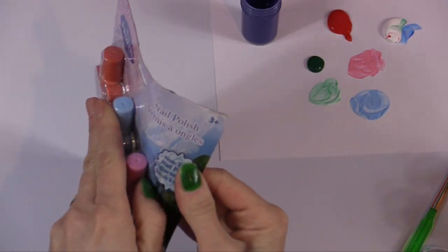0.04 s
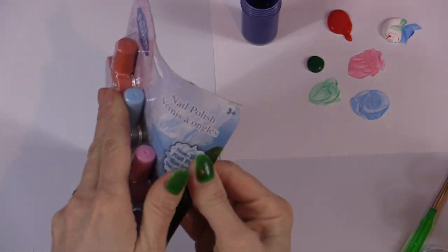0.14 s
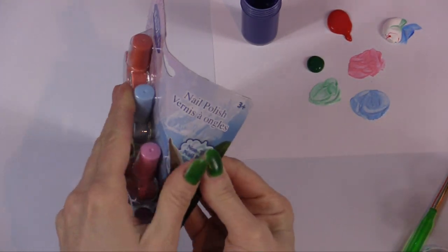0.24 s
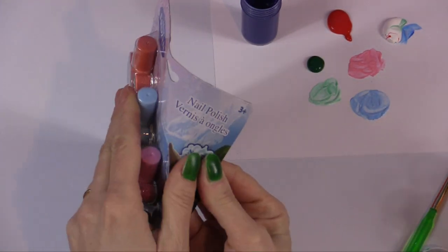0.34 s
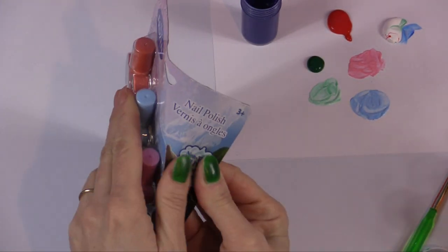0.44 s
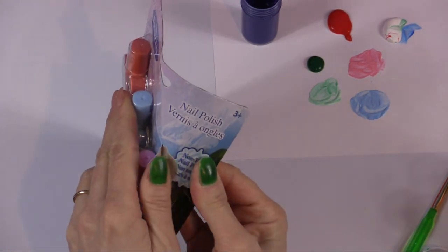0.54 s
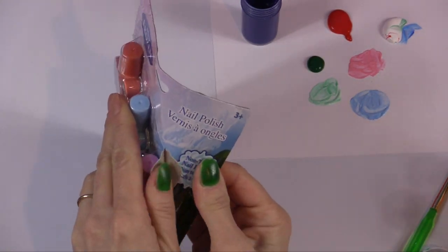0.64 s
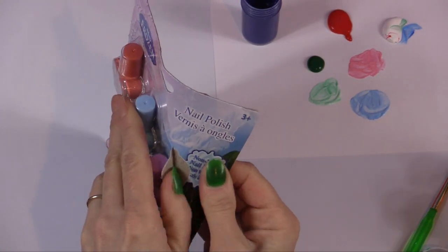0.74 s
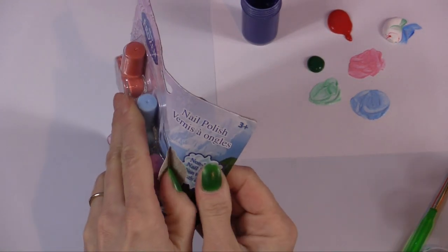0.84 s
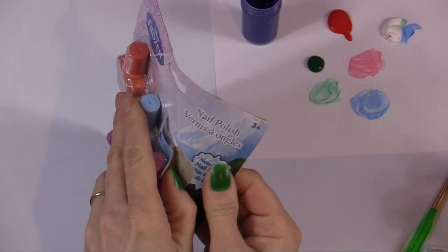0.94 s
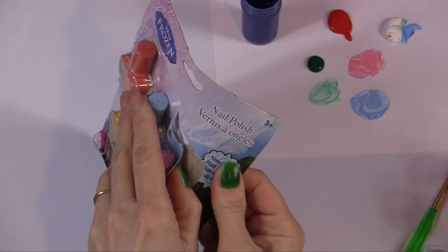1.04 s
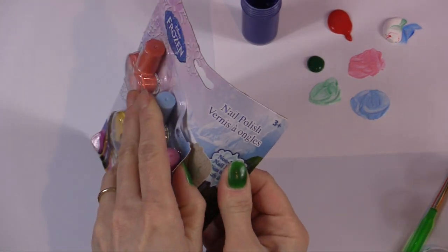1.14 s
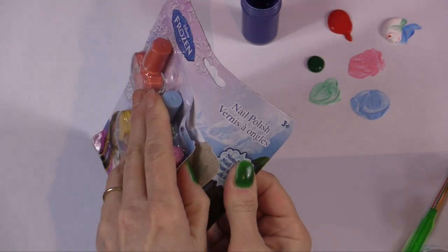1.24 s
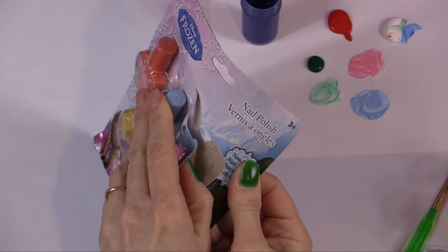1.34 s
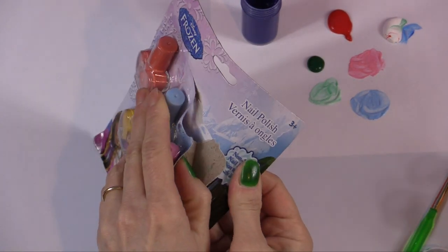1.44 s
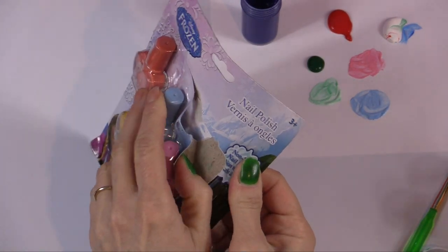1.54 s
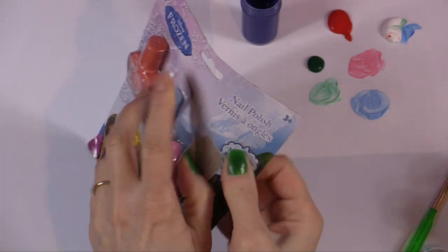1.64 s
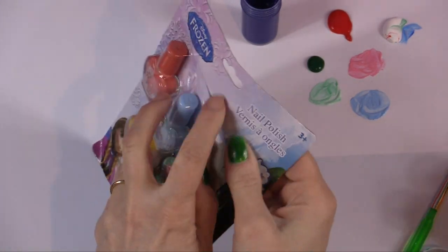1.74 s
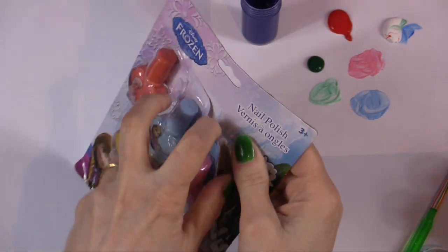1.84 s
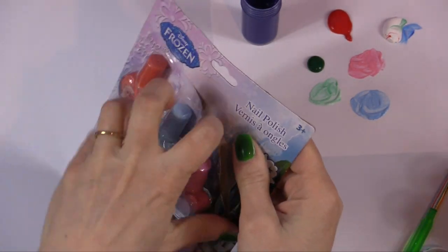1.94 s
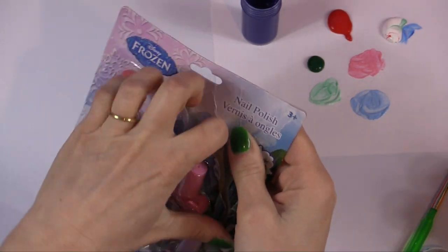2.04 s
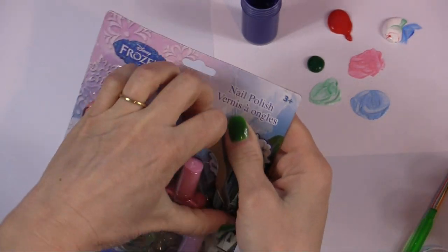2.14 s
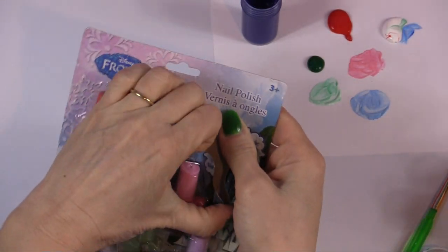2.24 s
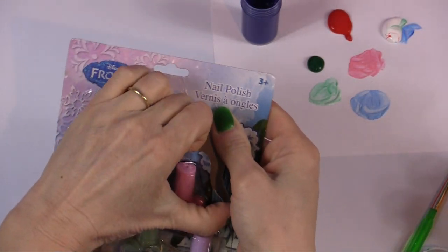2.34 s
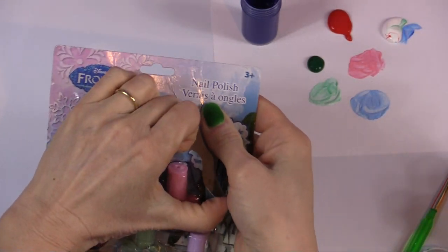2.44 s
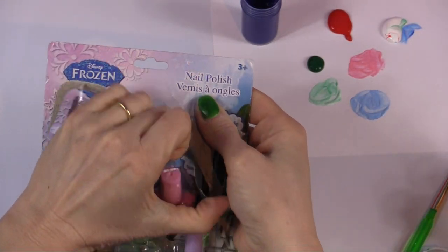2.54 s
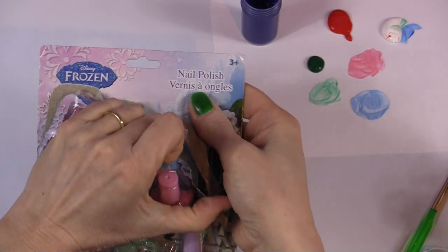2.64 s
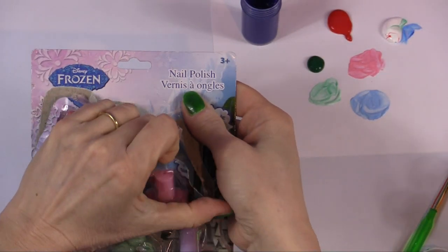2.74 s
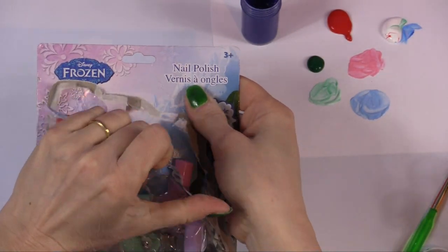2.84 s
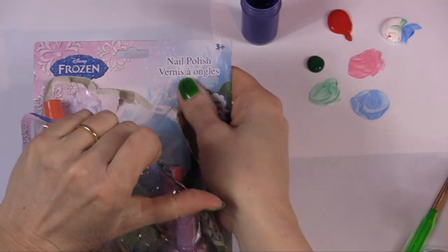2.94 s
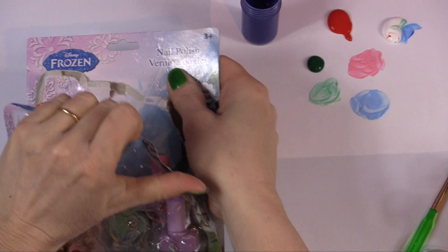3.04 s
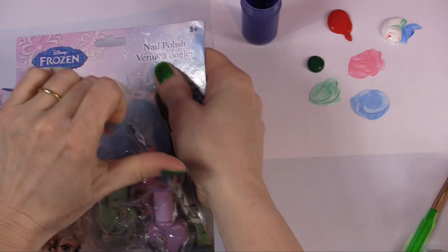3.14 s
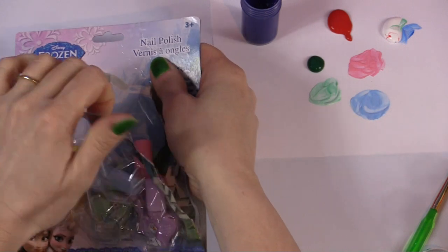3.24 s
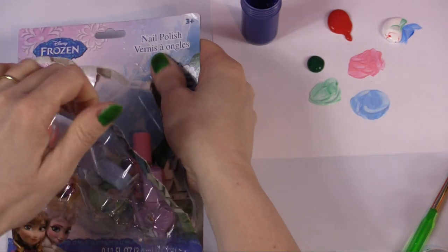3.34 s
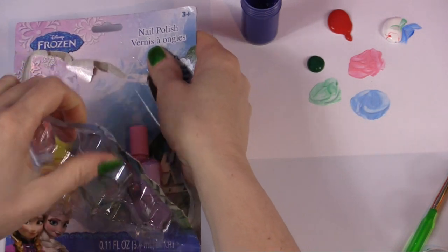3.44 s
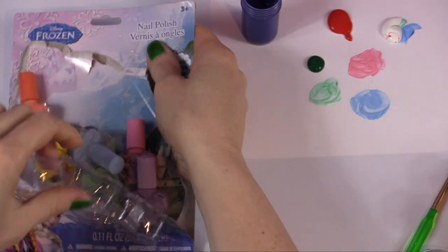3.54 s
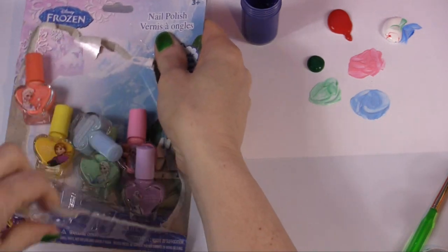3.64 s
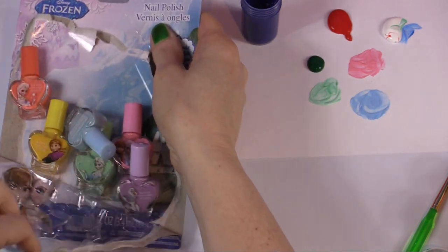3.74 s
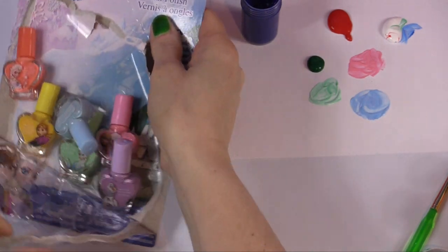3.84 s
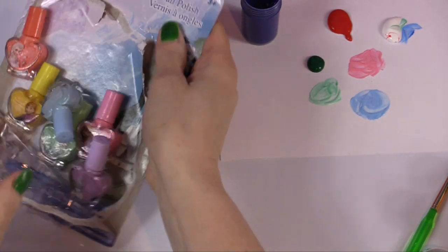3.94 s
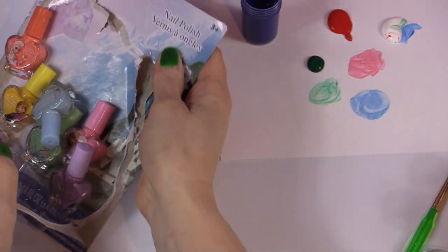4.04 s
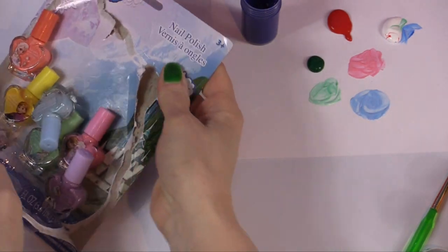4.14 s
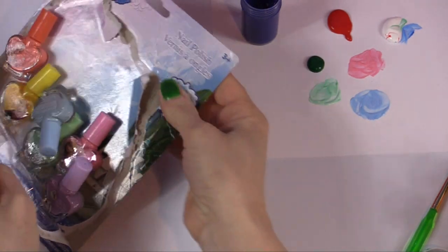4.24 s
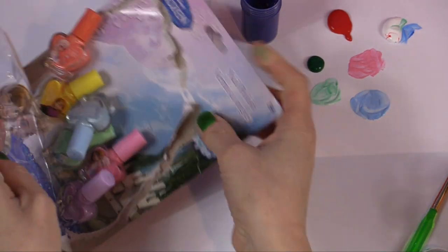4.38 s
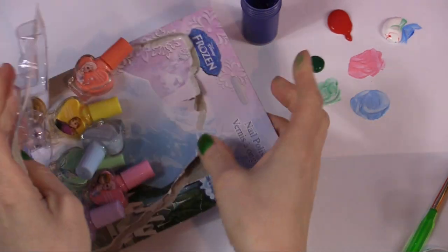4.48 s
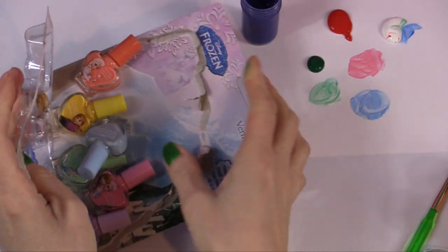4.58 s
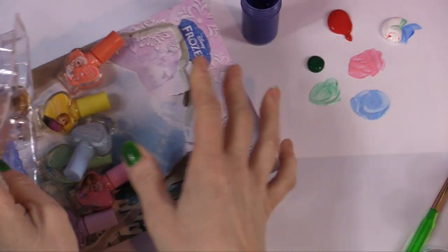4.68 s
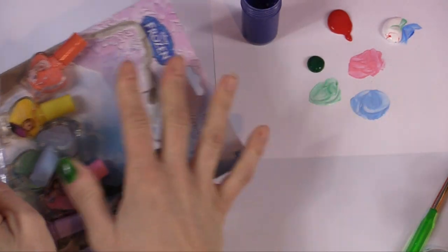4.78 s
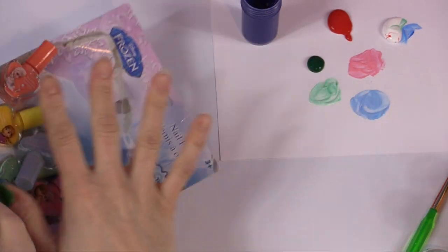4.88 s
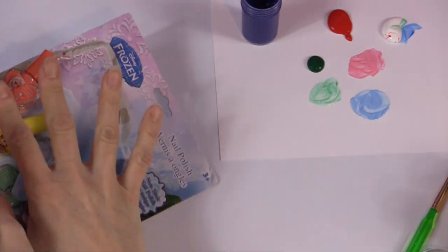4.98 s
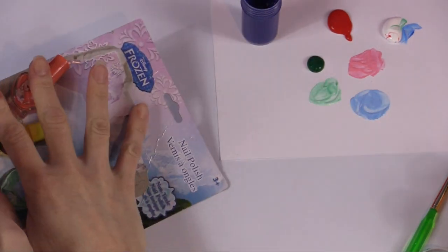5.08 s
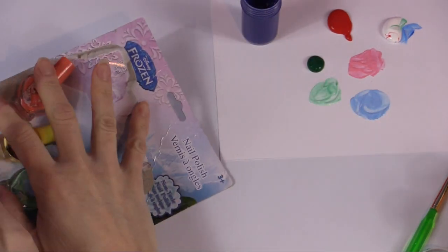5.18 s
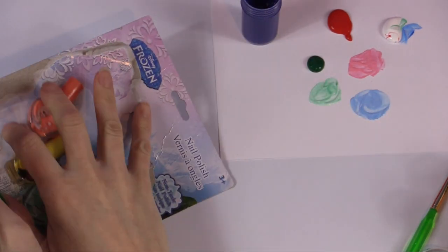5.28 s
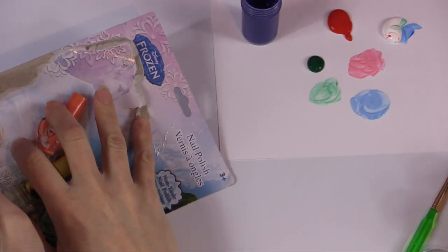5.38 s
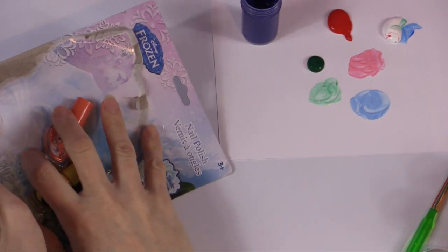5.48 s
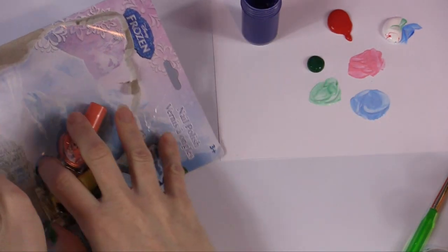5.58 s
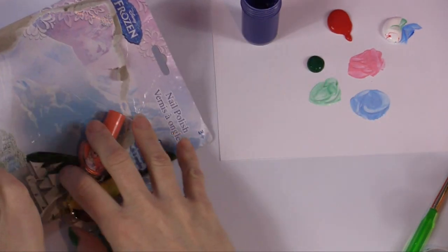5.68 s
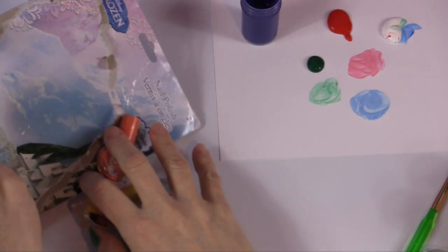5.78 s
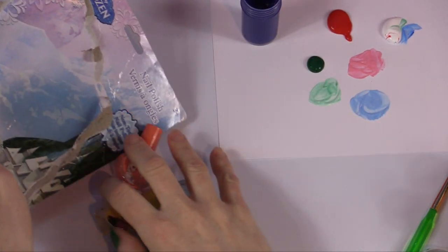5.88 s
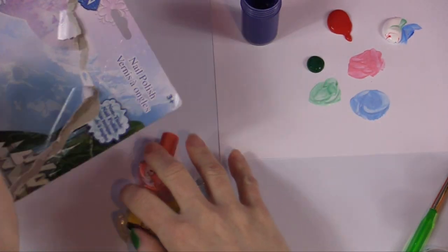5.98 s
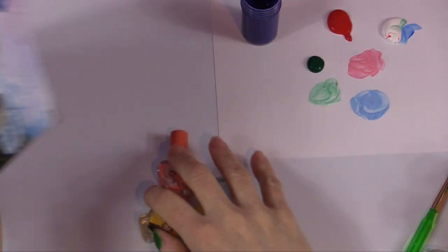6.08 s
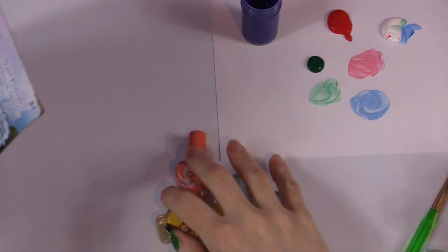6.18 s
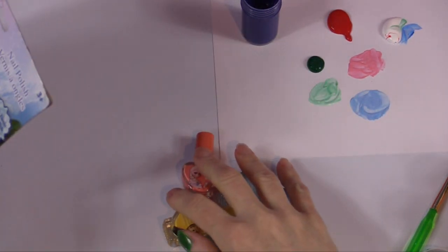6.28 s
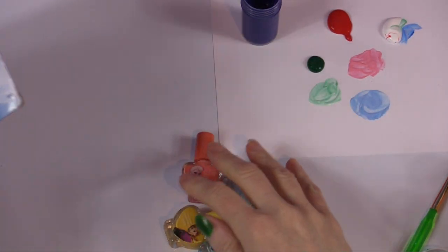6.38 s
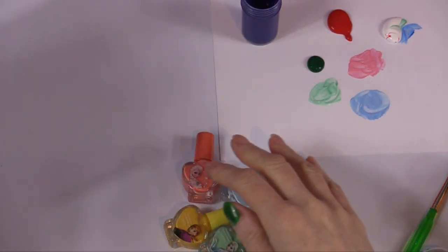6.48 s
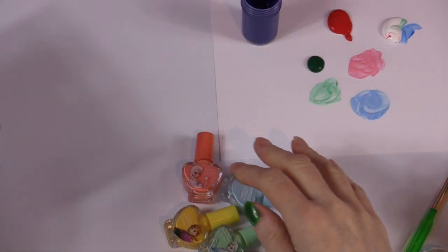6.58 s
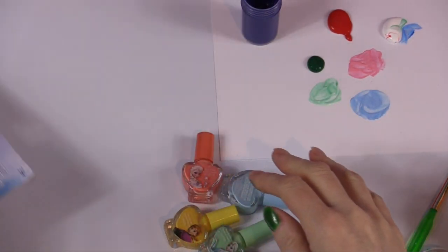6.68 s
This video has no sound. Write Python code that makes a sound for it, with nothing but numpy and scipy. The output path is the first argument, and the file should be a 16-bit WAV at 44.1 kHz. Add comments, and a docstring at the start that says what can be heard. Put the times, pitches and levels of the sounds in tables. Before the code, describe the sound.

Close in a small, softly echoing room with quiet hiss, hands peel a plastic blister from a card. A few crisp snaps come at 0.2-0.4 s, then sparse crackle; around 0.9-1.6 s the glued seam opens in a faint gritty rasp with isolated clicks and a soft low rub. From 1.8 s the snaps crowd together, with a very sharp pop near 2.27 s. The loudest stretch is 2.5-3.4 s: hard cracks, hollow buckling plastic, short paper rips and dull bumps. It thins to lighter crinkles until 4.3 s, with small scrapes and a bump near 4.6 s. At 5.0-5.35 s more snaps join a light sliding scrape and a barely audible high thin squeak. From about 5.4 to 6.15 s small bottles tumble onto the paper-covered table in quick dull knocks, strongest at the end. Then near silence, with a faint tick around 6.35 s.

```python
"""In a small room, close to the microphone, hands peel a plastic blister off its cardboard card.
Each pull builds up until the glued paper gives way in crackle and short rips (random tiny fractures
ringing stiff patches), and the thin plastic buckles in sharp snaps (shaped noise bursts and short rings).
Then the card is pushed aside (stick-slip grains), and small bottles tumble off it and knock on
a paper-covered table (noise blows through resonant bodies). Room echo and a quiet hiss surround it all."""
import sys
import numpy as np
from scipy import signal
from scipy.fft import rfft, irfft, next_fast_len
from scipy.io import wavfile
from scipy.ndimage import uniform_filter1d

SR = 44100
rng = np.random.default_rng(int(sys.argv[2]) if len(sys.argv) > 2 else 0)


def store_pcm(level_fs):
    """Save levels as 16-bit WAV."""
    pcm = np.round(np.clip(level_fs, -1, 1) * 32767).astype(np.int16)
    wavfile.write(sys.argv[1], SR, np.atleast_2d(pcm).T)


N = 296081  # length in samples

# Buckles of the blister, and in the last row a snap-like flick of the card. Each row: start in seconds, crack
# level in dB, crack pitch in Hz, # level of the whole sheet flexing in dB, sheet pitch in Hz.
BUCKLES = [(0.1875, -16.5, 4840, -36.5, 1690), (0.2735, -16, 4030, -22, 940),
           (0.298, -10.5, 3600, -30.5, 1340), (0.399, -32.5, 7430, -54, 750),
           (0.586, -27.5, 3400, -46, 1040), (0.9245, -25, 4700, -60, 1310),
           (0.9659, -23, 11350, -31.5, 1010), (1.004, -13.5, 3830, -34.5, 1700),
           (1.255, -30.5, 4490, -58, 980), (1.2859, -14.5, 3730, -44, 1170),
           (1.482, -13.5, 5250, -33.5, 1720), (1.5585, -34, 5630, -34, 870), (1.6175, -20, 6000, -43, 1690),
           (1.7094, -26, 3540, -38.5, 920), (1.811, -22.5, 4220, -37, 830),
           (1.854, -16.5, 3430, -31.5, 501), (1.882, -13.5, 4630, -32, 1650),
           (1.9004, -9.5, 8300, -28.5, 501), (1.939, -20, 3610, -41, 500), (1.9702, -26.5, 3670, -30, 786),
           (1.995, -20.5, 3960, -43, 934), (2.046, -25, 4030, -39.5, 900), (2.162, -42.5, 3570, -32, 825),
           (2.2476, -12.5, 3820, -30, 780), (2.2657, -17, 4130, -27, 1240), (2.271, -3, 4160, -24, 715),
           (2.3253, -18.5, 4350, -30.5, 840), (2.357, -18.5, 3380, -14, 968),
           (2.383, -18.5, 3560, -32.5, 1210), (2.4487, -19, 2670, -32.5, 820),
           (2.5238, -14.5, 4510, -32.5, 610), (2.5391, -7.5, 4460, -28.5, 1130),
           (2.583, -8.5, 3430, -24.5, 850), (2.6114, -9, 3700, -17.5, 762), (2.6257, -2, 7920, -17, 1270),
           (2.647, -9, 3960, -19.5, 1050), (2.7958, -11, 9000, -20, 805), (2.8584, -12.5, 5080, -27, 684),
           (2.8759, -13, 3410, -20, 875), (2.8854, -13, 3350, -14, 810), (2.9178, -2, 2800, -18.5, 845),
           (2.9773, -5, 4500, -13, 900), (2.9914, -19, 2850, -25.5, 1630), (3.022, -3.5, 3310, -19.5, 597),
           (3.1014, -17, 7240, -33.5, 1410), (3.1294, -22, 3210, -24.5, 1690),
           (3.1782, -12, 3230, -18.5, 554), (3.212, -13, 7950, -22, 1140),
           (3.2505, -10.5, 3310, -20.5, 680), (3.3451, -15.5, 3520, -20.5, 1220),
           (3.374, -20, 11000, -39, 1300), (3.3959, -12.5, 3310, -20, 1350), (3.4863, -23, 3250, -36, 820),
           (3.5227, -29.5, 4820, -28.5, 646), (3.5805, -18.5, 3700, -24.5, 680),
           (3.6399, -24, 2860, -31, 620), (3.674, -23.5, 4100, -34, 1360),
           (3.7912, -23.5, 3640, -30.5, 670), (3.8291, -24.5, 4300, -34, 1070),
           (3.913, -22.5, 2970, -41, 820), (3.9784, -13.5, 3790, -32.5, 900),
           (4.0262, -23, 3900, -34.5, 600), (4.1194, -26.5, 3130, -37.5, 860),
           (4.2124, -27.5, 4220, -39, 1230), (4.236, -22, 5800, -48, 1220), (4.2667, -20, 3470, -57, 1190),
           (4.3101, -21.5, 5030, -38, 960), (4.528, -30, 2800, -33.5, 1610),
           (5.008, -17.5, 5000, -32, 1170), (5.022, -19, 5200, -53, 910), (5.1332, -18, 4750, -31, 565),
           (5.242, -19.5, 5000, -46, 1130), (5.299, -16, 4280, -33.5, 980),
           (5.328, -19.5, 5000, -35.5, 960), (6.341, -32, 5670, -52.5, 900)]
# Hands, bottles and card bump the table. Each row: start in seconds, thud level in dB, thud pitch in Hz.
TABLE_KNOCKS = [(1.899, -37.5, 149), (2.996, -27.5, 212), (3.023, -24.5, 253), (3.5875, -27, 494),
                (4.623, -33.5, 690), (4.716, -43, 1300), (5.046, -36, 584), (5.182, -38, 815),
                (5.373, -34, 614), (5.447, -37.5, 615), (5.561, -33, 513), (5.574, -27.5, 490),
                (5.645, -36, 490), (5.706, -25, 324), (5.734, -25.5, 436), (5.785, -27.5, 536),
                (5.826, -32, 545), (5.876, -31.5, 377), (5.94, -29, 540), (6.047, -24, 590),
                (6.071, -25.5, 533), (6.102, -23, 750), (6.139, -31.5, 660), (6.386, -45.5, 400)]
# Fast runs of tearing and scraping. Each row: start in seconds, length in seconds,
# crackle level in dB, card level in dB.
FIBRE_RIPS = [(0.522, 0.065, -54.5, -67), (2.594, 0.031, -19.5, -26), (2.81, 0.075, -32, -33.5),
              (2.969, 0.021, -24, -22.5), (3.021, 0.049, -41, -29.5), (3.169, 0.017, -25.5, -21),
              (3.24, 0.012, -27, -24), (3.314, 0.023, -36, -24), (3.389, 0.0039, -18.5, -27),
              (3.586, 0.016, -41.5, -53), (4.449, 0.062, -60, -43.5), (4.618, 0.029, -43, -36),
              (4.86, 0.039, -44.5, -42), (4.998, 0.038, -40.5, -43)]
# Pulls that strain the paper. Each row: moment of giving way in seconds, build-up in seconds,
# crackle level in dB.
PAPER_PULLS = [(1.0, 0.083, -49.5), (1.48, 0.12, -47.5), (1.9, 0.2, -41), (2.261, 0.089, -33),
               (2.601, 0.13, -34.5), (2.95, 0.17, -49.5), (3.381, 0.13, -56.5), (3.74, 0.28, -51),
               (4.217, 0.066, -46.5), (4.59, 0.035, -48), (5.301, 0.033, -49)]
# Pushes that slide the card along. Each row: start in seconds, length in seconds, level in dB.
CARD_PUSHES = [(2.818, 0.15, -39), (4.212, 0.19, -54), (4.446, 0.16, -51), (4.865, 0.22, -47.5),
               (5.2, 0.52, -47)]
# The glued seam opens with a gritty rasp that swells twice. Each row: time in seconds, level in dB.
SEAM_LEVEL = [(.8, -64), (.89, -47), (.98, -42), (1.12, -57), (1.22, -48), (1.47, -41.5), (1.66, -75)]
# Spectrum of the thin plastic. Each row: frequency in Hz, relative level in dB per Hz.
PLASTIC_SPECTRUM = [(900, -4), (2100, -5), (3500, 1), (5500, -2.5), (8000, -2), (10000, -7), (12000, -5),
                    (16000, -14.5)]
# Spectrum of the card. Each row: frequency in Hz, relative level in dB per Hz.
CARD_SPECTRUM = [(20, -11), (100, -10), (300, -0.5), (560, 0.5), (850, 0), (1200, 1.5), (1600, -0.5),
                 (2100, -10), (4500, -42)]
# Spectrum of breaking paper fibres. Each row: frequency in Hz, relative level in dB per Hz.
FIBRE_SPECTRUM = [(900, -26), (2300, -0.5), (3600, 1), (5500, -2.5), (12000, -5.5), (16000, -9.5)]
# Spectrum of bottle, card and table top. Each row: frequency in Hz (for a hard blow), relative level in dB per Hz.
TABLE_SPECTRUM = [(25, -11), (90, -11.5), (220, -2.5), (600, -6), (1300, -8.5), (2200, -25), (5000, -47.5)]
# Spectrum of the opening seam. Each row: frequency in Hz, relative level in dB per Hz.
SEAM_SPECTRUM = [(2500, -25), (4000, -10), (8500, -11.5), (11500, -8.5), (16000, -18.5)]
# Spectrum of the pushed air. Each row: frequency in Hz, relative level in dB per Hz.
AIR_SPECTRUM = [(25, -1), (70, -2), (180, -9.5), (500, -34.5)]
# Spectrum of the steady hiss. Each row: frequency in Hz, relative level in dB per Hz.
HISS_SPECTRUM = [(20, -35), (80, -2.5), (350, -4.5), (2500, -17), (12000, -25.5), (16000, -32)]
# Reverberation of the room. Each row: frequency in Hz, time to fall by 60 dB in seconds.
REVERBERATION = [(1200, 0.23), (5000, 0.17)]

TOP_HZ = 16000  # upper band limit
SHORT = 4096  # samples in one brief sound or body response
SNAP_ROOM_DB = -2.5  # the sheet faces the microphone and sends less to the walls
# lesser buckles: crack and flex in dB over the crackle, and their central pitches
STRAY_DB, STRAY_FLEX_DB, STRAY_HZ, SHEET_HZ = 24.5, 5.5, 4270, 942
BUILD_DB, RELAX_DB_PER_S = 18, 171  # growth over the build-up, fall once the paper has given way
SHAKE_DB = -6  # the card trembles with the crackle
RUB_S, RUB_DB, RUB_DECAY_S, RUB_HZ = 1.032, -46.5, 0.076, 124  # start, level, fade and favoured pitch
TICK_DB = -4  # the tick of a hard knock, relative to its thud
PUSH_ATTACK_S, PUSH_RELEASE_S = 0.0081, 0.022
SCRATCH_DB = -8  # the scratch of fibres relative to the slide
SQUEAK_S, SQUEAK_LENGTH_S, SQUEAK_HZ, SQUEAK_DB = 5.19, 0.24, 12750, -63  # pitch in mid-stroke


def amp(db):
    """Decibels are twenty times the logarithm of amplitude."""
    return 10 ** (np.asarray(db) / 20)


def unit(x):
    """Scaling by the root mean square gives a signal unit power."""
    return x / np.sqrt(np.mean(x ** 2) + 1e-20)


def along(points, hz):
    """Linear interpolation of (Hz, value) points on a logarithmic frequency axis."""
    f, v = np.transpose(points)
    return np.interp(np.log(hz + 1), np.log(f + 1), v)


def curve(rows):
    """Linear interpolation in time: one value per sample from (s, value) rows."""
    return np.interp(np.arange(N) / SR, *np.transpose(rows))


def add(track, s, sound):
    """Superposition: a sound is summed into the track from time s on."""
    start = max(round(s * SR), 0)
    track[start:start + len(sound)] += sound[:max(N - start, 0)]


def body(x, spectrum, pitch_hz=1000, focus_db=0):
    """Minimum-phase resonance: x rings through a causal body that favours the octave around the pitch."""
    hz = np.fft.rfftfreq(SHORT, 1 / SR)
    octaves = np.log2((hz + 1) / pitch_hz)
    level_db = along(spectrum, hz) + focus_db / (1 + (2 * octaves) ** 2)
    cepstrum = irfft(np.log(amp(level_db)))
    # folding the cepstrum onto positive time makes the response causal
    cepstrum[1:SHORT // 2] *= 2
    cepstrum[SHORT // 2 + 1:] = 0
    response = irfft(np.exp(rfft(cepstrum)))
    return signal.fftconvolve(x, response)[:len(x)]


def burst(length, edge):
    """Impulsive excitation: a brief irregular force that stops more abruptly for a higher edge."""
    t = np.arange(SHORT) / SR
    return rng.standard_normal(SHORT) * np.exp(-(t / length) ** edge)


def sized(x, db, span):
    """Energy equivalence: a blow gets the energy of a sound of this level lasting span seconds."""
    return amp(db) * x * np.sqrt(span * SR / (np.sum(x ** 2) + 1e-20))


def grains(size, rate, spread_db):
    """Random fracture: tiny breaks at random moments (rate per second), many weak and a few strong."""
    chance, strength, sign = rng.random((size, 3)).T
    sizes = amp(spread_db * np.minimum(-np.log(1 - strength), np.pi))
    return (chance < rate / SR) * sizes * np.sign(sign - .5)


def wobble(size):
    """Smoothed noise: a random curve of rms 1 that turns about every size samples."""
    smooth = uniform_filter1d(rng.standard_normal(N), size)
    return unit(uniform_filter1d(smooth, size))


def crinkle(stroke, rate, spread_db, spectrum, low_hz, high_hz, count=6):
    """Local resonance: each tiny fracture rings one of several stiff patches, so the colour keeps changing."""
    size = len(stroke)
    steps = (np.arange(count) + rng.random(count)) / count
    pitches = low_hz * (high_hz / low_hz) ** steps
    patches = [body(stroke * grains(size, rate / count, spread_db), spectrum, hz, focus_db=14)
               for hz in pitches]
    return unit(sum(patches))


def hiss():
    """Stationary noise: white noise coloured by a fixed spectrum lies quietly under everything."""
    return amp(-63.5) * unit(body(rng.standard_normal(N), HISS_SPECTRUM))


def snaps(buckles):
    """Buckling instability: each patch cracks in a burst of about two milliseconds as the sheet swings.

    Returns what travels straight to the microphone and what spreads into the room."""
    direct, spread, t = np.zeros(N), np.zeros(N), np.arange(SHORT) / SR
    for s, crack_db, pitch_hz, flex_db, sheet_hz in buckles:
        swing = np.sin(2 * np.pi * sheet_hz * t) * np.exp(-t / 0.0012)
        flex = body(swing + burst(length=0.0056, edge=1.0), CARD_SPECTRUM, sheet_hz, focus_db=5.5)
        flex = sized(flex, flex_db, span=0.0029)
        # one direction hears a jagged burst; over all directions its colour evens out
        jagged = burst(length=0.0019, edge=1.25) * np.minimum(t / 0.00087, 1)
        crack = body(jagged, PLASTIC_SPECTRUM, pitch_hz, focus_db=7.5)
        ring = np.sin(2 * np.pi * pitch_hz * t) * np.exp(-t / 0.0012)  # the patch rings for a few cycles
        crack = unit(crack) + 0.55 * unit(ring)
        impulse = 1. * (t == 0)
        scattered = body(impulse, PLASTIC_SPECTRUM, pitch_hz, focus_db=4.5)
        add(direct, s, sized(crack, crack_db, span=0.00031) + flex)
        add(spread, s, amp(SNAP_ROOM_DB) * (sized(scattered, crack_db, span=0.00048) + flex))
    return direct, spread


def strays(strain, count=45):
    """Strain release: lesser buckles at random, as strong as the strain of the moment; rows as in BUCKLES."""
    rows = []
    for moment, force, patch, grip in rng.random((count, 4)):
        db = 20 * np.log10(strain[int(moment * N)] + 1e-9) + 6 * (force - .5)
        crack_hz = STRAY_HZ * 2 ** (patch - .5)
        sheet_hz = SHEET_HZ * 2 ** (grip - .5)
        rows.append((moment * N / SR, db + STRAY_DB, crack_hz, db + STRAY_FLEX_DB, sheet_hz))
    return rows


def rips():
    """Cascading fracture: a run of fibres breaks at once, swells, crackles and shakes the card."""
    out, t = np.zeros(N), np.arange(SHORT) / SR
    for s, length, crackle_db, card_db in FIBRE_RIPS:
        stroke = np.abs(np.sin(np.pi * np.clip(t / length, 0, 1))) ** 0.59
        crackle = crinkle(stroke, 2400, 7.4, FIBRE_SPECTRUM, low_hz=1980, high_hz=13500)
        shake = crinkle(stroke, 2500, 4.3, CARD_SPECTRUM, low_hz=400, high_hz=1490)
        add(out, s, sized(crackle, crackle_db, length) + sized(shake, card_db, length))
    return out


def pull_strength():
    """Loading and failure: the crackle of every pull grows steadily in dB, then relaxes quickly."""
    t = np.arange(N) / SR
    total = np.zeros(N)
    for s, build, db in PAPER_PULLS:
        growth = BUILD_DB * (t - s) / build
        relaxation = RELAX_DB_PER_S * (s - t)
        total += amp(db + np.minimum(growth, relaxation))
    return total


def peeling(strain):
    """Progressive fracture: fibres part one by one; along the glued seam they crowd into a gritty rasp."""
    clusters = uniform_filter1d(grains(N, rate=260, spread_db=6.0), size=60)
    clumps = 0.54 + unit(np.abs(clusters))
    fibres = crinkle(clumps, 6000, 6.8, FIBRE_SPECTRUM, low_hz=2480, high_hz=11600)
    seam = body(grains(N, rate=7000, spread_db=1.5) * clumps, SEAM_SPECTRUM)
    return strain * fibres + amp(curve(SEAM_LEVEL)) * unit(seam)


def wafts(handling):
    """Air displacement: each jerk of the card pushes a little low-pitched air noise at the microphone."""
    effort = np.abs(uniform_filter1d(handling ** 2, size=900)) ** 0.3
    return amp(-28.5) * effort * unit(body(rng.standard_normal(N), AIR_SPECTRUM))


def rub():
    """Soft friction: the skin of the palm drags over the card in a low rumble that dies away."""
    t = np.maximum(np.arange(N) / SR - RUB_S, 0)
    stroke = np.minimum(t / PUSH_ATTACK_S, 1) * np.exp(-t / RUB_DECAY_S)
    darker = np.array(TABLE_SPECTRUM) * [.3, 1]  # frequencies lowered
    rumble = body(rng.standard_normal(N), darker, RUB_HZ, focus_db=8)
    return amp(RUB_DB) * stroke * unit(rumble)


def knocks():
    """Impact: a dry blow and a chatter of contacts tick the plastic and thud in bottle, card and table top."""
    out = np.zeros(N)
    for s, thud_db, pitch_hz in TABLE_KNOCKS:
        hardness = min(pitch_hz / 400, 1)  # soft contacts sound darker and tick less
        chatter = burst(length=0.007, edge=0.75) * grains(SHORT, rate=500, spread_db=4)
        blow = burst(length=0.007, edge=0.67) + 3 * chatter
        thud = body(blow, np.array(TABLE_SPECTRUM) * [hardness, 1], pitch_hz, focus_db=8.5)
        tick = body(burst(length=0.0009, edge=0.55) + chatter, PLASTIC_SPECTRUM, 4200, focus_db=10.5)
        tick = hardness * sized(tick, thud_db + TICK_DB, span=0.0037)
        add(out, s, sized(thud, thud_db, span=0.019) + tick)
    return out


def push_strength():
    """Driven motion: the sliding amplitude of every push starts, holds and runs out exponentially."""
    t = np.arange(N) / SR
    total = np.zeros(N)
    for s, length, db in CARD_PUSHES:
        attack = np.clip((t - s) / PUSH_ATTACK_S, 0, 1)
        release = np.exp(-np.maximum(t - s - length, 0) / PUSH_RELEASE_S)
        total += amp(db) * attack * release
    return total


def sliding(motion, count=6):
    """Stick-slip friction: the card moves in uneven jerks of fine grains that ring different patches."""
    jerks = amp(4 * wobble(size=1100))
    patches = []
    for hz in np.geomspace(360, 1250, count):
        slips = amp(2 * wobble(size=600)) * grains(N, rate=1500, spread_db=2.0)
        patches.append(body(slips, CARD_SPECTRUM, hz, focus_db=15))
    return motion * unit(jerks * sum(patches))


def squeak():
    """Stick-slip tone: a fingernail on the plastic gives one thin, unsteady tone that arches with the stroke."""
    stroke = np.sin(np.pi * np.clip((np.arange(N) / SR - SQUEAK_S) / SQUEAK_LENGTH_S, 0, 1))
    pitch = SQUEAK_HZ + 300 * (stroke - 1) + 90 * wobble(size=60)  # Hz
    return amp(SQUEAK_DB) * stroke * unit(np.sin(2 * np.pi * np.cumsum(pitch) / SR))


def room(x, gap, wet_db):
    """Reverberation: the walls answer after a short gap with a decaying noise tail."""
    out, hop = np.zeros(N), SR // 4
    for start in range(0, N, hop):  # a fresh tail every quarter second, as the hands move
        hz, t, z = signal.stft(rng.standard_normal(SR // 2), SR, nperseg=256)
        decay = amp(-60 * t / along(REVERBERATION, hz)[:, None])
        tail = signal.istft(z * decay, SR, nperseg=256)[1]
        tail *= 1 + 0.4 * np.exp(-np.arange(len(tail)) / SR / 0.0064)  # near surfaces are strongest
        echo = signal.fftconvolve(x[start:start + hop], tail / np.linalg.norm(tail))
        add(out, start / SR + gap, echo)
    return amp(wet_db) * out


def scene():
    """Superposition: pulls and pushes work on fibres, plastic and card; the room adds echo and hiss."""
    pull, push = pull_strength(), push_strength()
    strain = pull + amp(SCRATCH_DB) * push
    direct, spread = snaps(list(BUCKLES) + strays(strain))
    tearing = rips() + peeling(strain)
    card_motion = push + amp(SHAKE_DB) * pull
    rest = tearing + knocks() + sliding(card_motion) + rub() + squeak()
    echo = room(spread + rest, gap=.006, wet_db=-9.0)
    return (direct + rest + wafts(direct + tearing) + echo + hiss())[None]


def record(dry):
    """Soft saturation and band limiting: the highest peaks are rounded off, nothing stays above TOP_HZ."""
    held = dry / (1 + np.abs(dry / .54) ** 4) ** (1 / 4)
    size = next_fast_len(N + SHORT)
    passband = np.fft.rfftfreq(size, 1 / SR) < TOP_HZ
    return irfft(rfft(held, size) * passband, size)[:, :N]


dry = scene()
out = record(dry)
store_pcm(out)
```